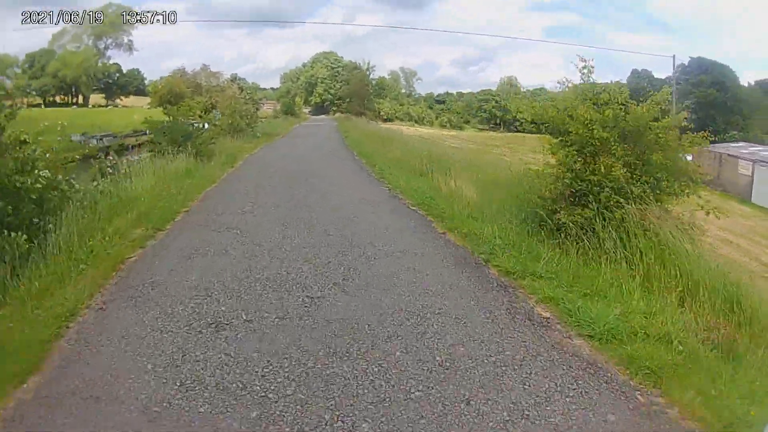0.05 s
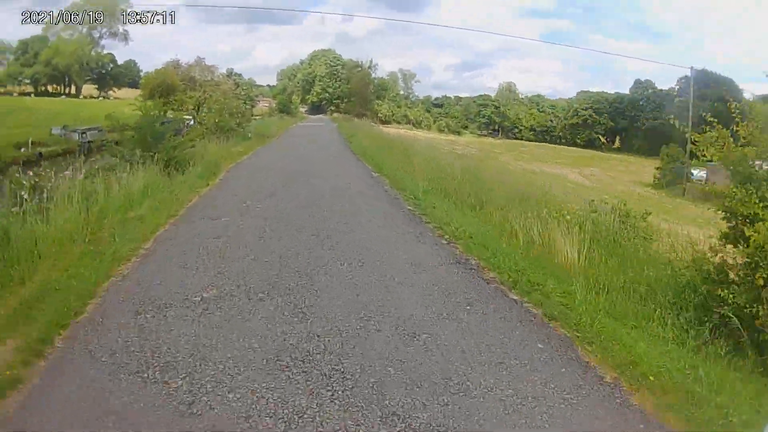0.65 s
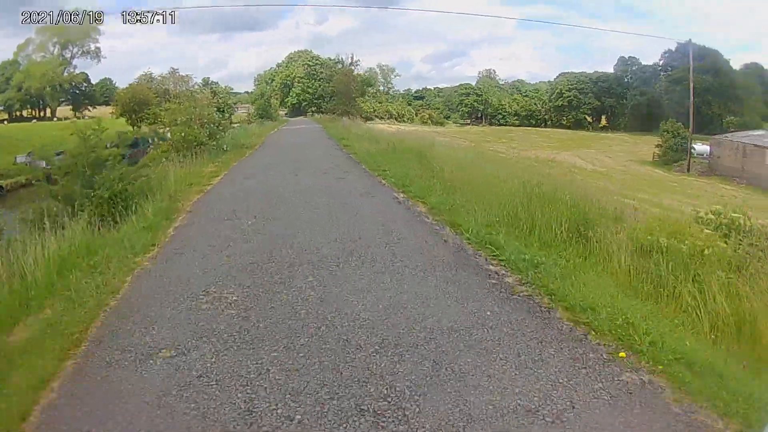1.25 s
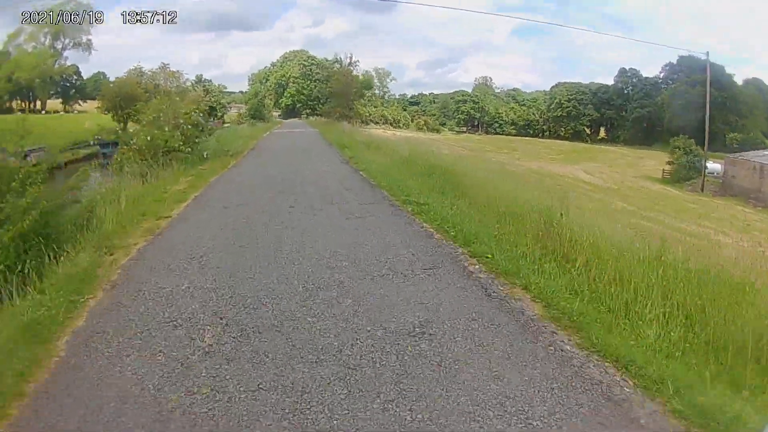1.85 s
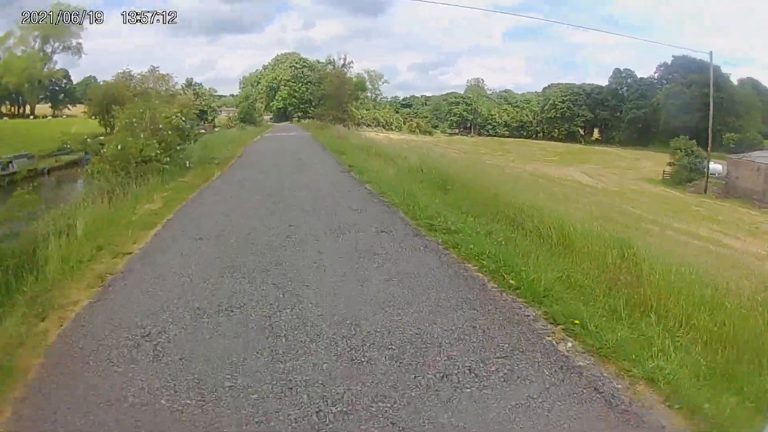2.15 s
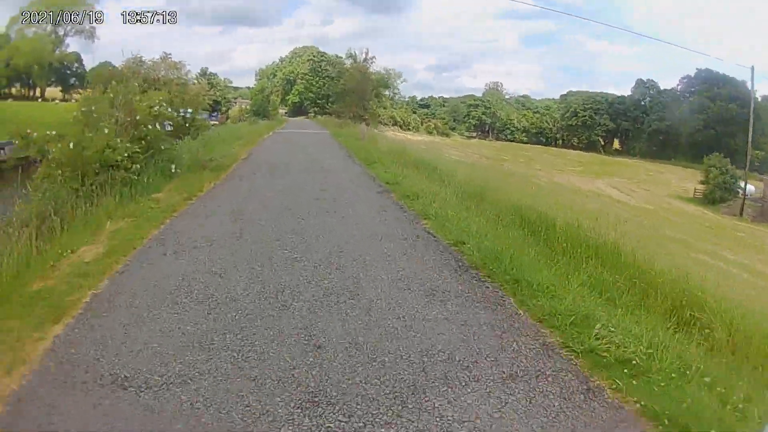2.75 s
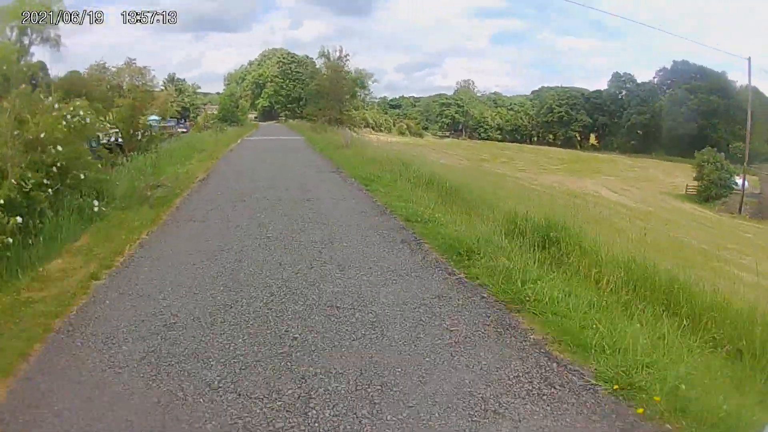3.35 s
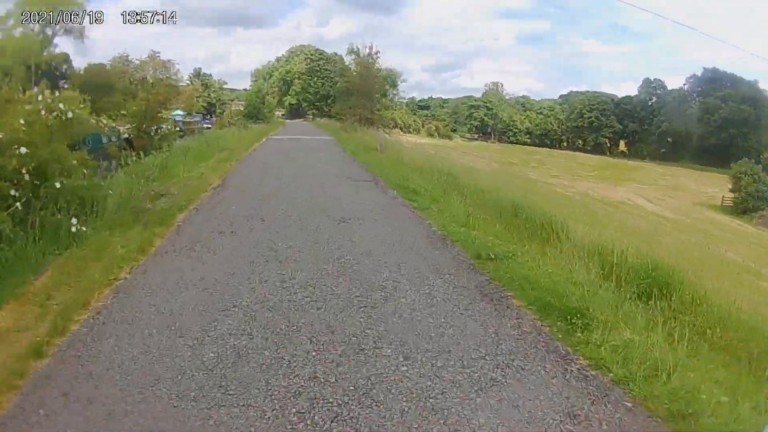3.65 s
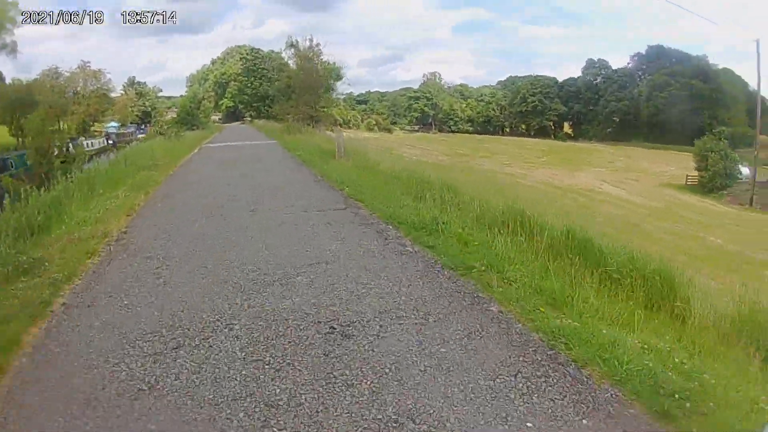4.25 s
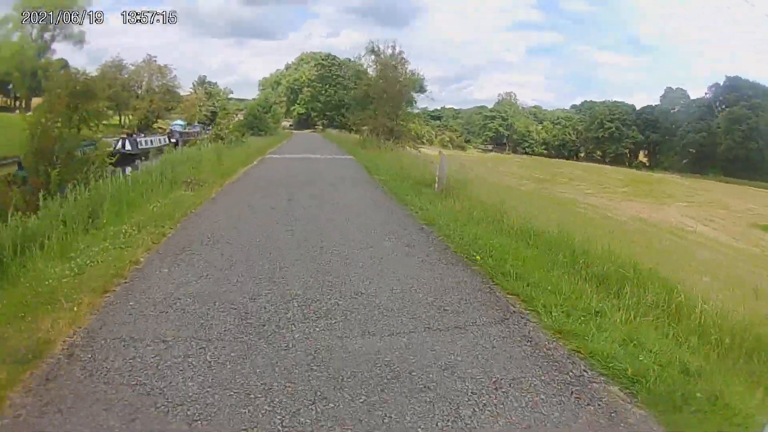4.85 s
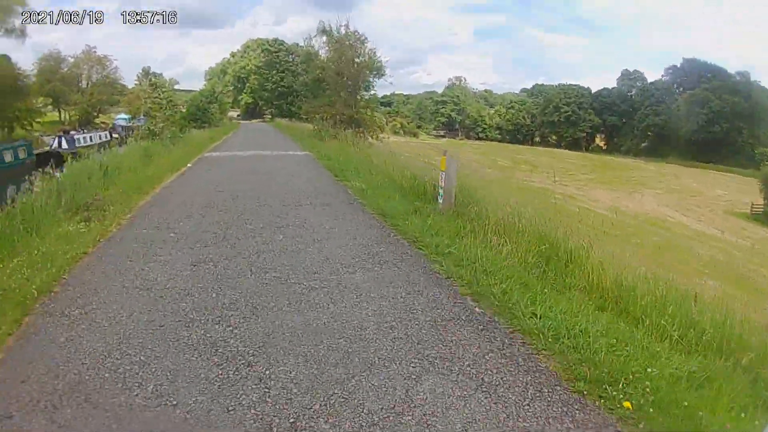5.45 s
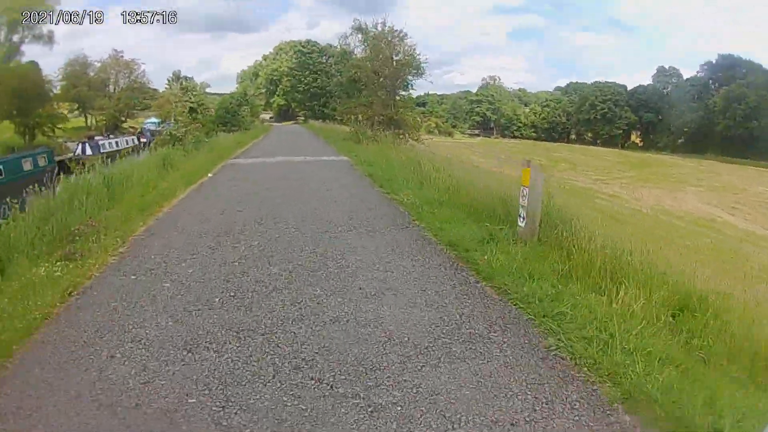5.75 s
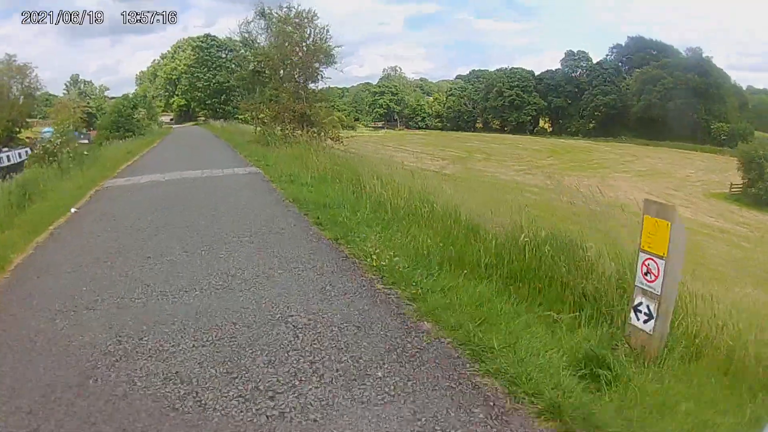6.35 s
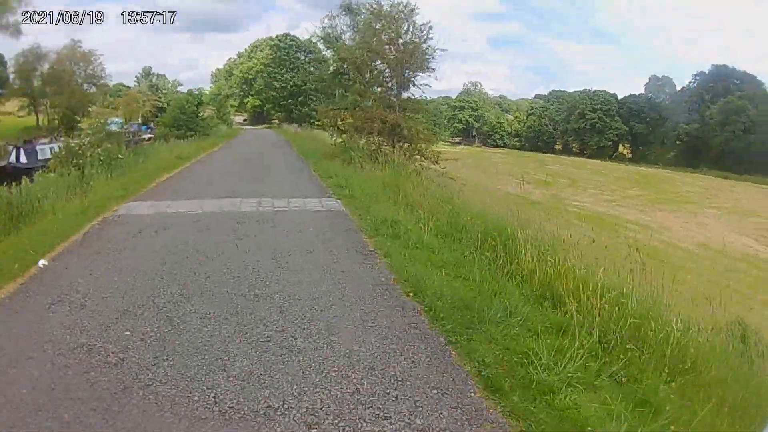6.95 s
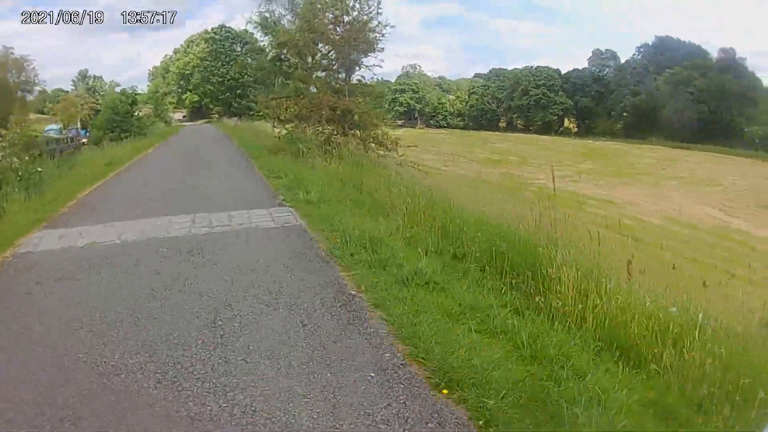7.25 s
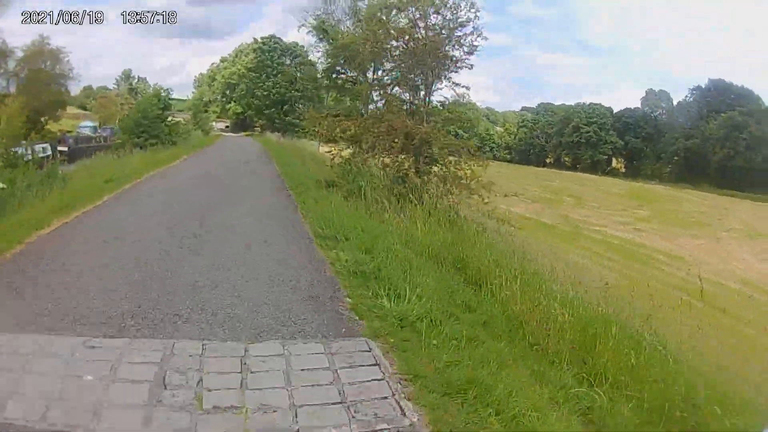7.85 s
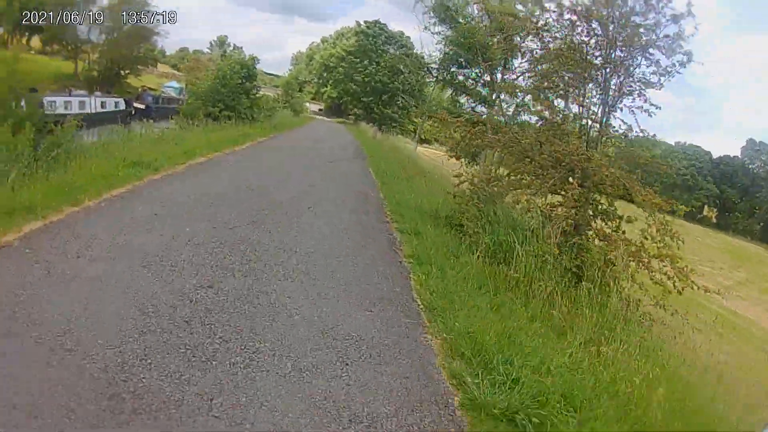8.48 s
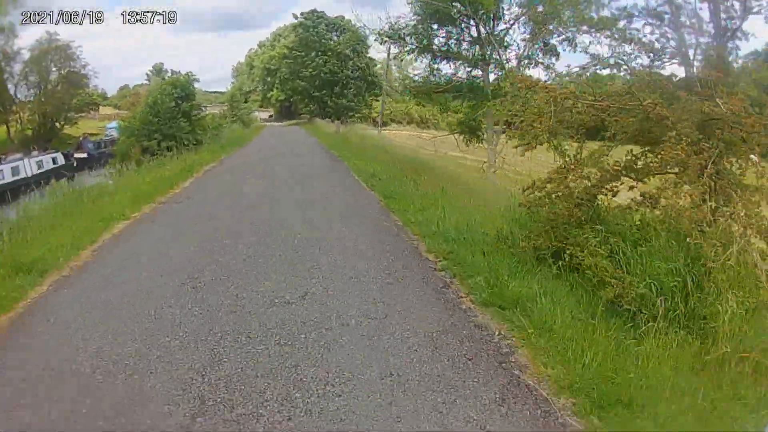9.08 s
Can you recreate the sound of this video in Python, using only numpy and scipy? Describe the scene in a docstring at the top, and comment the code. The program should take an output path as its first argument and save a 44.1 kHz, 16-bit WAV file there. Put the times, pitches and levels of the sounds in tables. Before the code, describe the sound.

An electric bike rolls over coarse asphalt with a steady tyre rumble, while bumps make the camera case knock, rattle and thump.

```python
"""An electric bike on a coarse asphalt path, heard at no distance by a cased camera mounted on the bike.
From the start, chippings shake the tyres, frame and case, and the mount sways at its own low resonance,
over faint microphone hiss and electronic sizzle. Bumps soon make the case knock, rattle and creak.
A wheel drops over edges with deep thumps near 5 s and 8 s. A strip of setts sets the case knocking,
and one sharp click follows the strip, just after 8 s."""
import sys
import numpy as np
from scipy import signal
from scipy.fft import rfft, irfft
from scipy.io import wavfile
from scipy.ndimage import uniform_filter1d

SR = 44100
rng = np.random.default_rng(int(sys.argv[2]) if len(sys.argv) > 2 else 0)


def inscribe(sig):
    """Save sig as 16-bit PCM at rate SR to the path in sys.argv[1].

    A 1-D sig is mono; a 2-D sig holds one channel per row.
    Samples are clipped to [-1, 1] before scaling.
    """
    pcm = np.round(np.clip(np.atleast_2d(sig).T, -1, 1) * 32767)
    wavfile.write(sys.argv[1], SR, pcm.astype(np.int16))


N = 406602
TIME = np.arange(N) / SR

# walls of the case: (frequency [Hz], width [Hz], gain in road buzz [dB], gain in a knock [dB])
CASE_MODES = [(838, 101, -12, -13), (1003, 92, -8, -17), (1058, 66, -5.5, -8), (1212, 108, -3.3, -5),
              (1410, 92, 0, 0), (1518, 250, -21, -17), (1718, 102, -17, -39), (1975, 99, -17.5, -21.5)]
# latch and small parts: (frequency [Hz], width [Hz], gain [dB])
LATCH_MODES = [(1966, 182, 5.5), (2486, 235, 3.5), (3130, 290, -3.5), (3350, 120, -2), (3450, 270, -3.5),
               (3894, 144, -1), (4080, 190, -0.5), (4980, 600, -14.5)]


def from_db(db):
    """Decibels to gain."""
    return 10 ** (np.asarray(db) / 20)


def rms_one(x):
    """Scale to unit power."""
    return x / np.sqrt(np.mean(x ** 2) + 1e-20)


def drift(per_s):
    """A random wander of unit power, with per_s new values a second."""
    return rms_one(np.interp(TIME * per_s, np.arange(4000), rng.standard_normal(4000)))


def resonate(x, hz, width_hz):
    """A damped pair of coupled modes: flat top, steep skirts."""
    high = np.hypot(hz, width_hz / 2) + width_hz / 2
    edges = np.clip([high - width_hz, high], 10, .48 * SR)
    return signal.sosfilt(signal.butter(2, edges, "band", fs=SR, output="sos"), x + 1e-18)


def steady(x, window_s):
    """Even out the slow swells of a noise, leaving unit power."""
    power = uniform_filter1d(x ** 2, int(window_s * SR))
    return x / np.sqrt(np.abs(power) + 1e-3 * np.mean(x ** 2))


def grit(per_s, spread_db):
    """Tiny impacts at random moments, most weak and a few strong."""
    sizes = from_db(spread_db * np.minimum(rng.exponential(1, N), 4))
    return rms_one(sizes * (rng.random(N) < per_s / SR))


def shake(impacts, modes):
    """Every impact drives every mode with a strength and sign of its own; unit power."""
    return rms_one(sum(from_db(db) * resonate(impacts * rng.standard_normal(N), hz, width)
                       for hz, width, db in modes))


def blow(modes, vary_db, chatter, chatter_s, size=4096):
    """One contact rings a set of modes, then the faces touch again at uneven moments; peak 1."""
    retouch = rng.standard_normal(size) ** 5 * np.exp(-np.arange(size) / (chatter_s * SR))
    force = signal.unit_impulse(size) + chatter * retouch / np.linalg.norm(retouch)
    ring = sum(from_db(db + vary_db * rng.standard_normal()) * resonate(force, hz, width)
               for hz, width, db in modes)
    return ring / np.abs(ring).max()


def add(out, s, sound):
    """Mix a sound in at s seconds."""
    at = int(s * SR)
    out[at:at + len(sound)] += sound[:N - at]


def coarseness():
    """How much coarser than average the asphalt under the bike is, in dB."""
    # coarseness along the path: (time [s], level [dB])
    road = [(0.1, -28.5), (3.06, -29), (3.41, -26.5), (3.61, -28), (5.49, -28), (6.54, -27.5), (6.69, -28),
            (9.1, -28.5)]
    level_db = np.interp(TIME, *np.transpose(road))
    return level_db - level_db.mean()


def jiggle_db():
    """How hard the case is jiggling at each moment; 0 when it sits still."""
    # stretches where the shaken case keeps moving: (start [s], length [s], extra level [dB])
    jiggles = [(0.697, 0.44, 0.5), (1.25, .3, 0.5), (3.2, .15, 1.5), (4.724, 0.12, 0.5), (5.03, .35, 0),
               (7.38, 0.15, 7), (7.94, .36, 4)]
    return sum(db * ((TIME > s) & (TIME < s + length_s)) for s, length_s, db in jiggles)


def mount_sway():
    """Each undulation of the path swings the camera on its mount; it dies back to a restless minimum."""
    # undulations of the path: (start [s], length [s], level before lift [dB])
    undulations = [(0.598, 0.072, -23.5), (0.81, 0.053, -19.5), (1.173, 0.064, -18.5), (2.164, 0.03, -21.5),
                   (2.253, 0.1, -21.5), (2.614, 0.051, -21), (3.124, 0.067, -19.5), (3.305, 0.15, -20.5),
                   (3.757, 0.083, -18.5), (4.099, 0.043, -21), (4.185, 0.181, -22), (4.403, 0.038, -23.5),
                   (4.494, 0.059, -18.5), (4.645, 0.024, -24), (4.8, 0.11, -21), (5.093, 0.085, -20),
                   (5.32, 0.12, -21.5), (5.626, 0.088, -22), (5.778, 0.045, -19.5), (5.923, 0.04, -23.5),
                   (6.12, 0.11, -22), (6.45, 0.091, -19.5), (6.669, 0.121, -22.5), (6.907, 0.079, -21),
                   (7.363, 0.17, -18), (7.638, 0.11, -19), (8.512, 0.16, -17.5), (9.078, 0.092, -21.5)]
    sway_hz, rest_db, lift_db = 34.48, -28, 0.94
    attack_s, release_s = 0.013, 0.026
    road = rng.standard_normal(N + SR)   # an extra second lets the swing build up
    swing = resonate(road, sway_hz, width_hz=7.6) + from_db(-10) * resonate(road, sway_hz, width_hz=19.5)
    level = from_db(rest_db + 0.95 * coarseness() + 3 * drift(per_s=9))
    for s, length_s, db in undulations:
        before, after = np.maximum(s - TIME, 0), np.maximum(TIME - s - length_s, 0)
        swell = from_db(db + lift_db) * np.exp(-before / attack_s - after / release_s)
        level = np.maximum(level, swell)
    swing = level * steady(swing[SR:], window_s=0.078)
    # a springy mount cannot start or stop swinging abruptly
    return signal.sosfiltfilt(signal.butter(2, [22, 54], "band", fs=SR, output="sos"), swing)


def road_levels():
    """Levels in dB of rumble, buzz and rattle: all follow the asphalt and the turn of the wheel."""
    # rough patches swell the rumble, smooth ones hush it: (middle [s], length [s], extra level [dB])
    patches = [(0.803, 0.36, 2), (1.197, 0.071, 5), (1.474, 0.11, 4.5), (1.646, 0.16, -3.5),
               (3.275, .14, 2), (3.696, 0.15, -5), (4.26, 0.11, 3.5), (4.59, 0.079, 4.5),
               (5.685, 0.093, 4.5), (5.814, 0.18, -3), (5.955, .1, 2.5), (6.424, 0.09, -6),
               (6.588, 0.19, 3.5), (6.863, 0.2, 2.5), (7.204, 0.09, 2.5)]
    wheel_hz, pressed_at_s = 3, 4.28   # the tyre presses harder once a turn
    coarse_db = coarseness()
    patch_db = sum(db * np.cos(np.pi * np.clip((TIME - s) / length_s, -.5, .5))
                   for s, length_s, db in patches)
    case_patch_db = 0.45 * patch_db   # the share that reaches the case and latch
    wheel_db = 0.5 * np.cos(2 * np.pi * wheel_hz * (TIME - pressed_at_s))
    load_db = wheel_db + 0.44 * drift(per_s=20)   # the surface varies from stretch to stretch
    rumble_db = -28.5 + 0.76 * coarse_db + load_db + patch_db
    buzz_db = -44 + coarse_db + load_db + case_patch_db
    rattle_db = -63.5 + 0.89 * coarse_db + load_db + case_patch_db + 0.53 * jiggle_db()
    return rumble_db, buzz_db, rattle_db


def rolling():
    """Chippings drum through the tyres into the frame, buzz in the case and rattle its latch."""
    # tyres and frame: (frequency [Hz], width [Hz], gain [dB])
    frame_modes = [(65.4, 27.8, -3.5), (102.3, 39, -6), (141.7, 25, -13), (214.6, 65.3, 1),
                   (271.6, 42.4, -1.5), (333.5, 19.2, -7), (370.3, 52, -10.5), (429.6, 46, -10.5),
                   (483, 47.5, -6), (525.6, 40.3, -7.5), (604, 150, -28), (693.6, 76, -22.5)]
    walls = [(hz, width, db) for hz, width, db, _ in CASE_MODES]
    rumble_db, buzz_db, rattle_db = road_levels()
    rumble = steady(shake(grit(per_s=3000, spread_db=2.5), frame_modes), window_s=0.22)
    buzz = shake(grit(per_s=3200, spread_db=2.0) * from_db(1.27 * drift(per_s=41)), walls)
    # the latch whispers all the time, with sparse ticks that swell and fade
    latch_ticks = from_db(-5 + 2.2 * drift(per_s=6)) * grit(per_s=36, spread_db=1.5)
    latch_whisper = from_db(2.0 * drift(per_s=28)) * grit(per_s=3000, spread_db=4.5)
    rattle = shake(latch_whisper + latch_ticks, LATCH_MODES)
    return from_db(rumble_db) * rumble + from_db(buzz_db) * buzz + from_db(rattle_db) * rattle


def hiss():
    """The microphone's own smooth, faint noise."""
    # colour of the noise floor: (frequency [Hz], relative density [dB])
    spectrum = [(100, 0), (2800, 3), (4800, 1), (6800, 0.5), (7600, 0.5), (10300, 0), (11600, -1),
                (12700, -1.5), (15600, -2)]
    hz, db = np.transpose(spectrum)
    bins_hz = np.maximum(np.fft.rfftfreq(N, 1 / SR), 1)
    colour = from_db(np.interp(np.log(bins_hz), np.log(hz), db))
    return from_db(-65) * rms_one(irfft(rfft(rng.standard_normal(N)) * colour, N))


def sizzle():
    """The camera's electronics fizz faintly and raggedly, louder for one second in every two."""
    # bands of the fizz: (frequency [Hz], width [Hz], gain [dB])
    bands = [(6200, 1800, -1.5), (9450, 310, 4), (11700, 1100, 3), (14000, 1000, -2)]
    busy_from_s, period_s = 1.08, 2
    idle = (TIME - busy_from_s) % period_s >= period_s / 2
    return from_db(-71 - 4.5 * idle + 2 * drift(per_s=64)) * shake(np.ones(N), bands)


def knocks(rows):
    """Each knock is a dead thud, a short ring of the case and a clack of the latch, which chatters on."""
    # the dead first part of a knock: (frequency [Hz], width [Hz], gain [dB])
    thud_modes = [(250, 280, 31), (950, 2000, -5), (1900, 3100, -39)]
    walls = [(hz, width, db) for hz, width, _, db in CASE_MODES]
    contact_s, cutoff_hz = 0.00056, 4760   # padded plastic contacts pass no high treble
    push = signal.windows.hann(int(contact_s * SR) + 2)   # a soft contact spreads the force in time
    out = np.zeros(N)
    for s, thud_db, ring_db, clack_db in rows:
        thud = blow(thud_modes, vary_db=0, chatter=0.64, chatter_s=0.0044)
        ring = blow(walls, vary_db=1, chatter=0.75, chatter_s=0.0043)
        clack = blow(LATCH_MODES, vary_db=3.5, chatter=0.65, chatter_s=0.00085)
        latch_chatter = blow(LATCH_MODES, vary_db=0.5, chatter=2.6, chatter_s=0.037)
        add(out, s, from_db(thud_db) * np.convolve(thud, push / push.sum()))
        add(out, s - .001, from_db(ring_db) * ring)
        add(out, s - .0005, from_db(clack_db) * clack)
        add(out, s, from_db(clack_db - 12) * latch_chatter)
    return signal.sosfilt(signal.butter(6, cutoff_hz, fs=SR, output="sos"), out)


def jolts():
    """Bumps and setts knock the case on its mount, right at the microphone."""
    # jolts along the path: (time [s], thud gain [dB], ring gain [dB], clack gain [dB])
    bumps = [(0.214, -26, -21.5, -54), (0.709, -18.5, -20.5, -42), (0.727, -19.5, -26, -38),
             (1.289, -19, -20.5, -49), (1.523, -35, -24.5, -43), (1.692, -43, -19.5, -38.5),
             (2.283, -22, -27, -41.5), (2.522, -38, -41, -42), (3.328, -39, -27, -40),
             (4.268, -34, -23.5, -35.5), (4.292, -39, -26, -38), (4.372, -39, -41, -42.5),
             (4.732, -29, -26.5, -43), (4.976, -20, -30, -53), (5.067, -11, -17, -33.5),
             (5.073, -19, -22.5, -38), (5.133, -36, -44, -33), (5.223, -37, -41, -37),
             (5.297, -23, -29, -45), (5.321, -20, -26.5, -35.5), (5.359, -39, -35, -38),
             (5.535, -34, -23, -57), (5.718, -25, -24.5, -43), (5.997, -31, -37, -37.5),
             (6.278, -42, -31, -38.5), (7.376, -15.5, -20.5, -49), (7.448, -13.5, -26, -40),
             (7.472, -24, -23, -40), (7.482, -26, -22, -39), (7.669, -35, -29, -59), (7.949, -34, -30, -36),
             (7.972, -9.5, -21, -40), (7.98, -17, -29, -36), (8.04, -30, -33, -37),
             (8.113, -22, -36, -37.5), (8.168, -43, -27.5, -37), (8.197, -25, -25.5, -41),
             (8.239, -32, -32, -56), (8.287, -19, -21, -39.5), (8.502, -22, -30, -41)]
    return knocks(bumps)


def small_knocks():
    """Little knocks come at random, thicker and harder while the case jiggles."""
    stray_per_s, jiggle_per_s = 1, 16
    thud_db, ring_db, clack_db = -39, -40, -46
    extra_db = jiggle_db()
    per_s = stray_per_s + jiggle_per_s * (extra_db > 0)
    at = np.flatnonzero(rng.random(N) < per_s / SR)
    at = at[at > SR // 100]
    levels_db = rng.standard_normal((len(at), 3)) + [thud_db, ring_db, clack_db]
    return knocks(np.column_stack([TIME[at], levels_db + extra_db[at, None]]))


def creaks():
    """The plastic case flexes: a quick run of tiny slips swells and fades in one resonance."""
    # flexes of the case: (start [s], length [s], frequency [Hz], peak [dB])
    flexes = [(1.67, 0.033, 2550, -41), (4.782, 0.03, 2510, -40), (5.05, 0.034, 4100, -44),
              (8.253, 0.037, 2390, -40), (8.255, 0.017, 3120, -41)]
    out = np.zeros(N)
    for s, length_s, hz, peak_db in flexes:
        swell = signal.windows.hann(int(length_s * SR)) ** 2
        slips = swell * rng.standard_normal(len(swell)) ** 3
        creak = resonate(slips, hz, width_hz=240) + from_db(-22) * resonate(slips, hz, width_hz=2200)
        add(out, s, from_db(peak_db) * creak / np.abs(creak).max())
    return out


def thumps():
    """A wheel drops over an edge; the tyre softens it into one short, deep push that jars the frame."""
    # drops of a wheel: (time [s], peak [dB])
    drops = [(4.976, -14), (5.0665, -17), (7.9751, -16.5)]
    tyre_contact_s = 0.0019
    push = np.pad(signal.windows.hann(int(tyre_contact_s * SR)), (0, SR // 20))
    thump = resonate(push, hz=219, width_hz=310)
    out = np.zeros(N)
    for s, peak_db in drops:
        add(out, s, from_db(peak_db) * thump / np.abs(thump).max())
    return out


def click():
    """Hard parts snap together for a millisecond or two."""
    # the one sharp snap: (time [s], peak [dB])
    snaps = [(8.0351, -24)]
    # bright ring of the hard parts: (frequency [Hz], width [Hz], gain [dB])
    click_modes = [(2300, 1400, -6), (3880, 1100, -6), (6300, 1700, -5), (9100, 1600, -8), (11330, 950, -1),
                   (14800, 800, -18)]
    out = np.zeros(N)
    for s, peak_db in snaps:
        add(out, s, from_db(peak_db) * blow(click_modes, vary_db=0, chatter=1.5, chatter_s=.001))
    return out


def scene():
    """The ride reaches the one microphone through the mount, with no room around it."""
    bed = mount_sway() + rolling() + hiss() + sizzle()
    return (bed + thumps() + creaks() + click() + jolts() + small_knocks())[None]


def record(dry):
    """The camera's mono track, with the top cut steeply."""
    cutoff_hz = 15700
    return signal.sosfilt(signal.ellip(12, .1, 80, cutoff_hz, fs=SR, output="sos"), dry)


dry = scene()
out = record(dry)
inscribe(out)
```